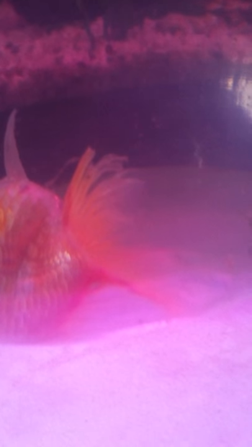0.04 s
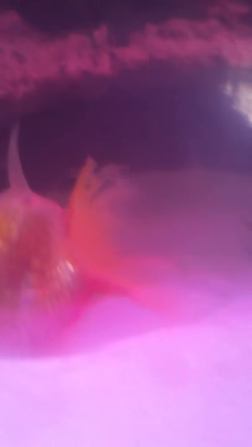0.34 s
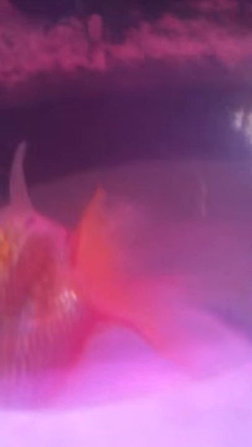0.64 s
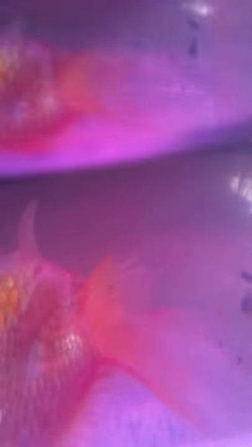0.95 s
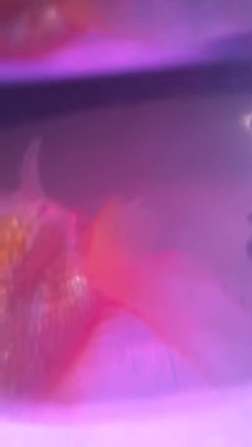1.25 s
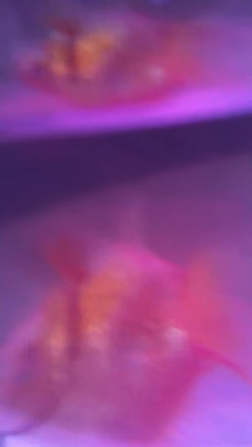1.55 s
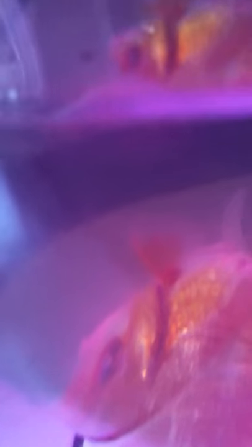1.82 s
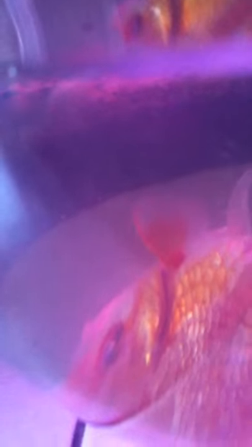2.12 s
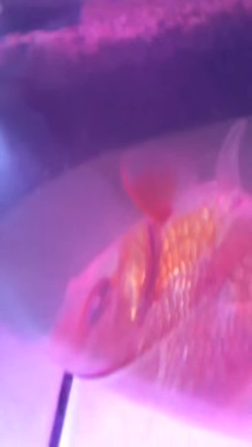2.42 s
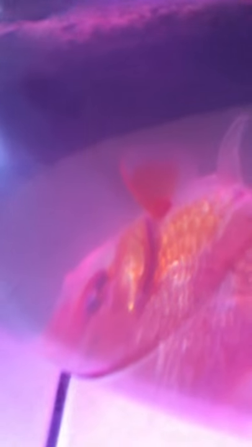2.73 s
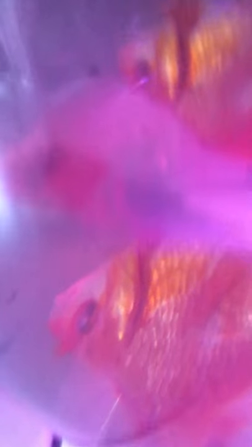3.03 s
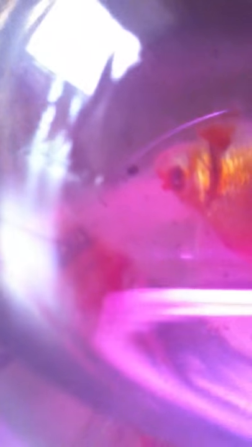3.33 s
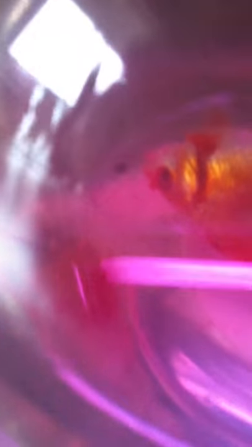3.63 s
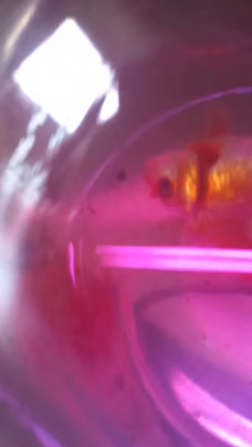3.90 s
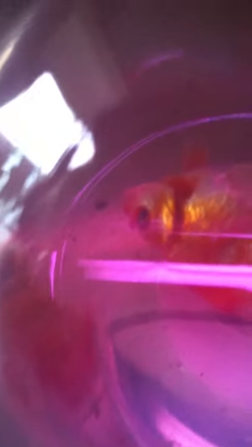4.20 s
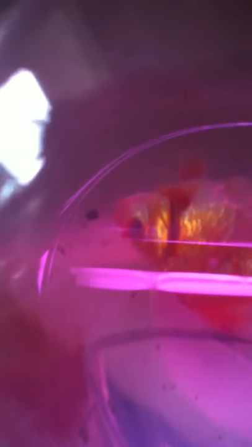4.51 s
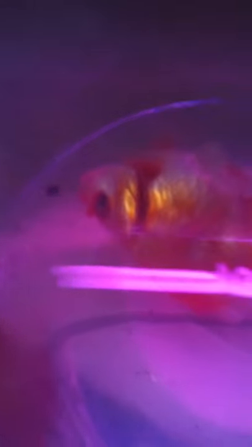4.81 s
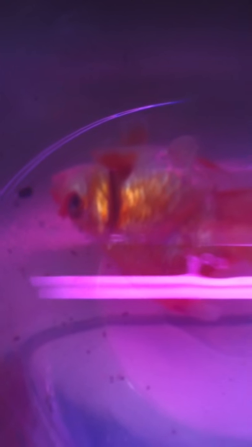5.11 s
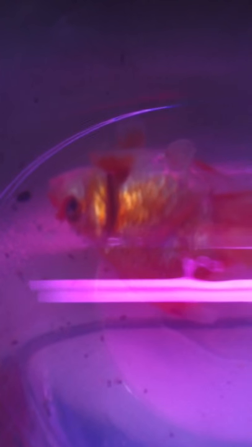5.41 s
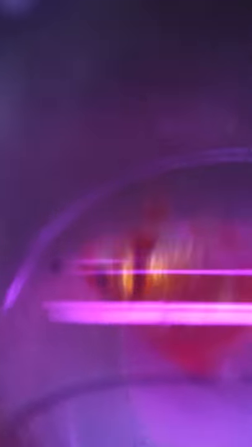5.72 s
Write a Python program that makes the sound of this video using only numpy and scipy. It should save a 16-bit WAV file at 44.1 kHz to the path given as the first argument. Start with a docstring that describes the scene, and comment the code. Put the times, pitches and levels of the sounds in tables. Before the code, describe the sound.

A fish tank's filter dribbles with small pings and plops, and late on a close knock bounces against the glass.

```python
"""In a small room, water trickles from a filter into a fish tank. Drops tick on the surface and trap air,
which rings as bubbles: small ones ping, large ones plop. Under them are churning water, a hiss and the
pump's hum. Something squeaks faintly and one drop snaps loudly. Near the end a dull, close knock
bounces twice and leaves the tank's glass ringing."""
import sys
import numpy as np
from scipy import signal
from scipy.fft import rfft, irfft, next_fast_len
from scipy.io import wavfile
from scipy.ndimage import map_coordinates

SR = 44100
rng = np.random.default_rng(int(sys.argv[2]) if len(sys.argv) > 2 else 0)


def transcribe(u):
    """Save the signal u as a 16-bit wav file named by the first command-line argument.

    u: samples, shape (n,) or (channels, n), limited to [-1, 1]; the rate is SR.
    q: integer samples, one column per channel.
    """
    v = np.clip(np.atleast_2d(u).T, -1, 1)
    q = np.round(v * 32767).astype(np.int16)
    wavfile.write(sys.argv[1], SR, q)


N = 253575

# the tones of the pump's hum: f/Hz, level/dB
PUMP_TONES = [(102, -77.5), (152, -66.5)]
# how strong the trickle is over time: t/s, churning level/dB, spray and hiss level/dB
TRICKLE = [(0.0, -54, -62), (0.77, -53, -60.5), (1.0, -55.5, -61.5), (2.49, -54.5, -61.5), (2.71, -54, -61),
           (3.68, -55, -62), (4.4, -55.5, -61), (4.79, -54.5, -61), (5.0, -54, -61.5)]
# the colour (how strong each pitch is) of churning water: f/Hz, level/dB
CHURN_COLOUR = [(25, -23), (50, -19.5), (90, -8), (130, -3), (190, 2.5), (290, 2), (335, -2.5), (400, -1.5),
                (520, -7), (700, -3), (870, -12.5), (1200, -15.5), (2600, -89)]
# the colour of the hiss: f/Hz, level/dB
HISS_COLOUR = [(350, -22), (700, -13), (1000, -1.5), (1700, -2.5), (2500, -5), (4000, -9.5), (5600, -9),
               (7500, -11.5), (11700, -10), (17000, -14.5)]
# the loudest drops: t/s, splash level/dB, bubble f/Hz, bubble level/dB,
# fizz f/Hz, fizz level/dB, rise time/s
DROP_HITS = [(0.094, -46, 6500, -54, 11100, -45, .005), (0.124, -57, 5500, -63, 9980, -44, .002),
             (0.207, -46, 5300, -28.5, 9000, -49, .0012), (0.249, -42, 8300, -35, 13900, -39, .0012),
             (0.387, -42.5, 5650, -44.5, 12300, -36, .0025), (0.614, -59, 5430, -45, 11000, -48, .006),
             (0.698, -55, 6900, -46, 10600, -39, 0.0027), (0.7558, -41, 5200, -39, 7800, -57, .0035),
             (0.843, -47.5, 3400, -54, 9400, -43, .0025), (0.903, -51, 7850, -50, 11800, -42, .0045),
             (1.017, -48, 8500, -56, 10800, -42, .002), (1.226, -49, 9000, -55, 12100, -39, .004),
             (1.32, -62, 5700, -45, 11500, -48, .002), (1.392, -41, 6000, -45, 11100, -44, 0.0046),
             (1.468, -60, 6900, -50, 11500, -49, .0035), (1.567, -45, 9220, -43.5, 12500, -37.5, .002),
             (1.619, -44.5, 7360, -47.5, 10100, -45.5, .003),
             (1.657, -46, 4560, -50.5, 11000, -47.5, 0.0033), (1.809, -46.5, 5200, -48.5, 11100, -47, .006),
             (1.926, -46, 5500, -38.5, 11000, -55, 0.0029), (2.0195, -40, 6060, -33, 14500, -47, 0.002),
             (2.191, -51, 6630, -37.5, 11000, -48, 0.0027), (2.224, -47, 6400, -37.5, 12200, -38.5, 0.0029),
             (2.3385, -48, 8450, -43, 12000, -44.5, .0018), (2.5319, -43, 4300, -45.5, 9650, -39, 0.0041),
             (2.758, -52, 7500, -48, 12300, -39.5, 0.0017), (2.8543, -35, 5700, -28.5, 11100, -26.5, .0007),
             (2.879, -53, 5070, -42.5, 8500, -51, .0013), (2.99, -65, 5950, -44, 10900, -44, 0.0055),
             (3.1295, -59, 8900, -45, 9900, -45, .0013), (3.19, -44.5, 5500, -46, 8000, -45, 0.0028),
             (3.235, -42, 5700, -41, 11900, -43.5, 0.0015), (3.31, -46, 3710, -56, 11500, -38.5, .0016),
             (3.352, -49, 3370, -50, 9100, -40, 0.0049), (3.364, -54, 3450, -47, 7000, -58, .003),
             (3.516, -65, 3860, -67, 12200, -39.5, .0014), (3.591, -44, 3590, -44.5, 9900, -40, .0018),
             (3.787, -42.5, 4530, -41, 9000, -54, .0015), (3.9149, -42, 6160, -34.5, 9400, -39.5, .0013),
             (4.007, -55, 5760, -60, 10000, -36, 0.0018), (4.079, -40, 5460, -57, 12800, -41.5, .004),
             (4.14, -41, 3850, -46, 9250, -40.5, .004), (4.1638, -56, 2460, -35.5, 3640, -36, 0.0013),
             (4.176, -38, 3470, -45, 5000, -46, 0.0032), (4.225, -41.5, 3750, -46, 7600, -48, 0.0057),
             (4.355, -39.5, 5340, -43, 11600, -37, 0.0017), (4.407, -52, 6000, -52, 9560, -43.5, .0025),
             (4.4443, -41.5, 6950, -38.5, 11900, -33.5, 0.0021), (4.545, -47, 7050, -54, 10200, -37, .0025),
             (4.5918, -40, 6760, -52, 11500, -47, .0055), (4.618, -43.5, 3500, -52, 7500, -46.5, .004),
             (4.837, -58, 6000, -63, 9530, -45.5, .0012), (4.9275, -51, 8300, -39, 12100, -44, .0014),
             (4.989, -61, 9000, -58, 13000, -40.5, .0025), (5.082, -40, 8500, -49, 12900, -43, 0.0041),
             (5.116, -45, 8000, -47, 12000, -39.5, .002), (5.189, -49, 8220, -45.5, 12500, -47, 0.0041),
             (5.361, -58, 6180, -42.5, 8000, -54, .0015), (5.543, -46, 5530, -45, 7500, -46, .0045),
             (5.669, -57, 8000, -53, 11400, -44, .006), (5.698, -43, 7550, -38, 9500, -45, 0.0044)]
# the colour of a splash: f/Hz, level/dB
SPLASH_COLOUR = [(200, 2), (700, 9), (1800, 3), (3900, 3.5), (5600, 6), (7500, -1), (11400, -1), (14000, 1),
                 (17000, -10)]
# single bubbles bursting at the surface: t/s, peak level/dB, f/Hz
BURSTING_BUBBLES = [(0.098, -48, 1590), (0.217, -46, 1780), (0.2475, -44.5, 3340), (0.388, -50, 1530),
                    (1.209, -49, 3220), (1.345, -43, 5450), (1.359, -44, 6100), (1.392, -44.5, 2210),
                    (2.0102, -41, 3260), (2.1148, -48, 3350), (2.4743, -45, 2370), (2.829, -41, 3200),
                    (3.304, -45.5, 1370), (3.331, -56, 1380), (3.547, -44, 3800), (3.816, -51, 1340),
                    (4.128, -40, 3450), (4.597, -51, 1350), (4.977, -48, 1380), (5.398, -45, 3240)]
# the loudest large bubbles: t/s, relative level/dB, f/Hz
LARGE_BUBBLES = [(0.2, -42, 653), (0.522, -41, 713), (0.847, -43.5, 746), (0.903, -43, 694),
                 (1.141, -47.5, 735), (1.224, -44, 393), (1.228, -43.5, 640), (1.463, -46, 426),
                 (1.811, -44.5, 660), (2.019, -45.5, 680), (2.063, -44, 676), (2.488, -46.5, 380),
                 (2.519, -44, 767), (2.527, -47.5, 384), (2.755, -49, 655), (2.759, -40.5, 370),
                 (2.851, -48, 386), (3.112, -33, 376), (3.151, -40.5, 353), (3.290, -40, 752),
                 (4.078, -36, 414), (4.083, -46, 785), (4.212, -44, 413), (4.232, -43, 436),
                 (4.24, -44, 717), (4.33, -43, 767), (4.365, -50.5, 425), (4.443, -44.5, 704),
                 (4.526, -42.5, 424), (4.523, -45, 730), (4.591, -38.5, 414), (4.597, -48, 780),
                 (4.661, -40.5, 707), (4.805, -41.5, 750)]
# a knock and its two bounces: t/s, push level/dB, contact time/s, ring level/dB
KNOCK_HITS = [(5.0602, -3.5, 0.0036, -23), (5.091, -8, 0.004, -0.5), (5.109, -14.5, 0.00444, -2)]
# the tones the glass rings with: f/Hz, relative level/dB, t60/s (the time to fade by 60 dB)
GLASS_TONES = [(140.6, -42.5, 0.36), (180, -30, 0.1), (260, -35.5, 0.091), (1530, -53, 0.35),
               (2790, -56, 0.19)]
# how long the room echoes at each pitch: f/Hz, t60/s
ROOM_FADE = [(150, 0.27), (1000, 0.37), (5500, 0.23), (8000, 0.2), (16000, 0.076)]


def amp(db):
    """Turn decibels into a number to multiply by."""
    return 10 ** (np.asarray(db) / 20)


def unit(x):
    """Scale a sound so that its average strength (rms) is 1."""
    return x / np.sqrt(np.mean(x ** 2) + 1e-20)


def along(points, hz):
    """Read between the rows of a (frequency, value) table, on a log scale of frequency."""
    freqs, values = np.transpose(points)
    return np.interp(np.log(hz + 1), np.log(freqs + 1), values)


def wobble(rate):
    """A smooth curve through `rate` random values a second."""
    return map_coordinates(rng.standard_normal(int(N * rate / SR) + 4), [np.arange(N) * rate / SR])


def filtered(x, response):
    """Turn each frequency in x up or down by response(hz)."""
    size = next_fast_len(N + 8192)
    return irfft(rfft(x, size) * response(np.fft.rfftfreq(size, 1 / SR)), size)[:N]


def noise(colour):
    """Noise shaped by rows of f/Hz, level/dB."""
    return unit(filtered(rng.standard_normal(N), lambda hz: amp(along(colour, hz))))


def add(track, s, sound):
    """Mix a sound into a track, starting at s seconds."""
    part = track[max(round(s * SR), 0):][:len(sound)]
    part += sound[:len(part)]


def bubble(hz, cycles, rise, onset):
    """Trapped air pulses: it swells over `onset` cycles, fades 60 dB over `cycles` and glides upward."""
    age = np.arange(int(cycles * SR / hz) + 2) * hz / SR
    envelope = amp(-60 * age / cycles) * (1 - np.exp(-age / onset))
    return envelope * np.sin(2 * np.pi * age * (1 + rise * age / cycles))


def swarm(rate, centre_hz, octaves, cycles, range_db):
    """Bubbles of random time and loudness, `rate` a second, up to `octaves` above or below the centre."""
    out = np.zeros(N)
    for when, pitch, size in rng.random((int(rate * N / SR), 3)):
        hz = centre_hz * 2 ** (octaves * (2 * pitch - 1))
        add(out, when * N / SR, amp(range_db * size ** 2) * bubble(hz, cycles, rise=0.19, onset=0.67))
    return unit(out)


def cluster(hz, width, samples):
    """Many bubbles of about one size ring together as a narrow band of noise."""
    freqs = np.fft.rfftfreq(samples, 1 / SR)
    band = 1 / (1 + ((freqs - hz) / (width * hz)) ** 2)
    return unit(irfft(rfft(rng.standard_normal(samples)) * band, samples))


def pump(waver_db=2.0, drift=0.33):
    """The filter's pump hums low and almost steadily."""
    hum, t = np.zeros(N), np.arange(N) / SR
    for hz, db in PUMP_TONES:
        gain = amp(db + waver_db * wobble(3.94))
        hum += gain * unit(np.sin(2 * np.pi * hz * t + drift * wobble(3.01)))
    return hum


def churn():
    """Stirred water makes a low wash, full of soft, overlapping bubbles."""
    wash = amp(1 + 0.44 * wobble(16)) * noise(CHURN_COLOUR)
    gurgle = swarm(rate=70, centre_hz=254.4, octaves=0.878, cycles=15.4, range_db=4.5)
    burble = swarm(rate=70, centre_hz=696, octaves=0.28, cycles=50, range_db=22)
    return wash + amp(-4) * gurgle + amp(-14) * burble


def spray(rate=90, range_db=9, tick_t60=0.014, rise_s=0.0016, centre_hz=9000, octaves=0.75):
    """Fine droplets tick, each at its own pitch, and a crowd of small bubbles blends into a fizz."""
    ticks, t = np.zeros(N), np.arange(SR // 20) / SR
    for when, size, pitch in rng.random((int(rate * N / SR), 3)):
        tick = cluster(centre_hz * 2 ** (octaves * (2 * pitch - 1)), width=0.27, samples=len(t))
        envelope = amp(range_db * size ** 2 - 60 * t / tick_t60) * (1 - np.exp(-t / rise_s))
        add(ticks, when * N / SR, envelope * tick)
    fizz = swarm(rate=260, centre_hz=3200, octaves=0.9, cycles=26, range_db=5)
    return amp(-4.5) * unit(ticks) + amp(-8) * fizz


def tinkle(level_db=-70.5, swell_db=5.5, swell_at_s=3.27, settle_s=1):
    """The stream keeps middle-sized and smaller bubbles tinkling; the sound swells once, then settles."""
    since = np.arange(N) / SR - swell_at_s
    swell = (since > 0) * np.exp(-np.abs(since) / settle_s)
    middle = swarm(rate=170, centre_hz=1340, octaves=0.19, cycles=44, range_db=13)
    smaller = swarm(rate=220, centre_hz=2900, octaves=0.45, cycles=30, range_db=6)
    return amp(level_db + swell_db * swell + 2.5 * wobble(14)) * (middle + amp(-5) * smaller)


def drops(spatter_t60=0.055, spatter_db=-17, snap_s=0.0071, linger=1.47, lead_s=0.016):
    """Each drop splashes and traps bubbles and finer fizz. Compact drops snap; drawn-out ones linger."""
    splash, pings = np.zeros(N), np.zeros(N)
    t = np.arange(SR // 8) / SR - lead_s  # starts just before the drop lands
    after = np.maximum(t, 0)
    splash_noise = noise(SPLASH_COLOUR)
    for s, splash_db, bubble_hz, bubble_db, fizz_hz, fizz_db, rise_s in DROP_HITS:
        snap = amp(-60 * after / (snap_s + linger * rise_s))
        spatter = amp(spatter_db - 60 * after / spatter_t60)
        envelope = (snap + spatter) * (1 + np.tanh(t / rise_s)) / 2
        add(splash, s - lead_s, amp(splash_db) * envelope)
        for hz, db, width in (bubble_hz, bubble_db, 0.094), (fizz_hz, fizz_db, 0.18):
            add(pings, s - lead_s, amp(db) * envelope * cluster(hz, width, len(t)))
            add(pings, s, amp(db) * droplets(hz))
        # one bubble breaks free as the drop lands and gives a clear ping
        add(pings, s, amp(bubble_db - 9) * bubble(bubble_hz, cycles=46, rise=0.037, onset=3.0))
    return splash * splash_noise + pings


def droplets(hz, first_s=0.0047, flight_s=0.045, fade_db=14, octaves=0.57, count=8):
    """Droplets thrown up by a drop fall back and tick around its pitch; the late ones are weaker."""
    out = np.zeros(SR // 8)
    for late, pitch in rng.random((count, 2)):
        ring = bubble(hz * 2 ** (octaves * (2 * pitch - 1)), cycles=30, rise=0.053, onset=2.1)
        add(out, first_s + flight_s * late ** 2, amp(-10 - fade_db * late) * ring)
    return out


def blips():
    """Single middle-sized bubbles burst at the surface with a short, soft blip."""
    out = np.zeros(N)
    for s, db, hz in BURSTING_BUBBLES:
        ring = bubble(hz, cycles=24, rise=0.056, onset=2.2)
        add(out, s, amp(db) * ring / np.abs(ring).max())
    return out


def plops(ring_db=4.5, stir_db=-17, stir_t60=0.1):
    """Large bubbles, pushed under by the stream, ring low and stir the water around them."""
    rings, stir, t = np.zeros(N), np.zeros(N), np.arange(SR // 6) / SR
    for s, db, hz in LARGE_BUBBLES:
        add(rings, s, amp(db + ring_db) * bubble(hz, cycles=34.4, rise=0.043, onset=2.2))
        add(stir, s, amp(db + stir_db - 60 * t / stir_t60))
    return rings + stir * noise([(40, -40), (150, -12), (400, 17), (720, 19), (1300, -7), (4000, -31)])


def squeak(start_s=2.405, rise_s=0.022, hold_s=0.22, fade_s=0.12, level_db=-60.5, waver_hz=21):
    """A faint, thin tone wavers and flutters, with a weaker one below it."""
    envelope = np.interp(np.arange(N) / SR, np.cumsum([start_s, rise_s, hold_s, fade_s]), [0, 1, 1, 0])
    pitches_hz = [hz + waver_hz * wobble(30) for hz in (2775, 1750)]
    upper, lower = [np.sin(2 * np.pi * np.cumsum(hz) / SR) for hz in pitches_hz]
    return amp(level_db + 4.5 * wobble(35)) * envelope * (upper + amp(-6.5) * lower)


def knock(bass_cut_hz=150, hardness=2.06, panel_hz=676, panel_q=3.15):
    """A knock and two bounces: each short push thumps a dull panel; the bounces set the glass ringing."""
    push, jolts, t = np.zeros(N), np.zeros(N), np.arange(N) / SR
    for s, db, contact_s, ring_db in KNOCK_HITS:
        force = np.abs(np.sin(np.pi * np.minimum(t / contact_s, 1))) ** hardness
        add(push, s, -amp(db) * force)
        add(jolts, s, amp(ring_db) * force / force.sum())
    thump = signal.sosfilt(signal.butter(5, bass_cut_hz, "high", fs=SR, output="sos"), push)
    panel = amp(14) * signal.lfilter(*signal.iirpeak(panel_hz, panel_q, SR), thump)
    ring = np.zeros(N)
    for hz, db, t60 in GLASS_TONES:
        # every jolt tops up the swing of this tone, which then dies away
        swing = signal.lfilter([1], [1, -amp(-60 / (t60 * SR))], jolts)
        ring += amp(db) * swing * np.sin(2 * np.pi * hz * t)
    # the surfaces grate for as long as they touch and shake
    grit = noise([(400, -42), (1000, -2.0), (1600, -4.5), (2400, -14), (3000, -11.5), (4200, -28),
                  (9000, -21.5), (16000, -31)])
    return thump + panel + ring + amp(-28) * np.hypot(push, thump) * grit


def tank_echoes(x, t60=0.041, first_s=0.0015):
    """Sound bounces quickly between water and glass; the rippling surface keeps changing the echoes."""
    t = np.arange(SR // 16) / SR
    echoes = rng.standard_normal((6, len(t))) * amp(-60 * t / t60) * (t > first_s)
    echoes /= np.linalg.norm(echoes, axis=1, keepdims=True)
    paths = signal.fftconvolve(x[None], echoes, axes=1)[:, :N]
    shares = np.array([wobble(8) for _ in paths])
    return np.sum(shares * paths, axis=0) / np.linalg.norm(shares, axis=0)


def room_echo(x, delay_s=0.007, pieces=14):
    """The room's echo, a little different from moment to moment; the highest pitches die first."""
    hz, t, spectra = signal.stft(rng.standard_normal((pieces, SR // 2)), SR, nperseg=256)
    fade = amp(-60 * t / along(ROOM_FADE, hz)[:, None])
    tails = signal.istft(spectra * fade, SR, nperseg=256)[1]
    out = np.zeros(N)
    for part, tail in zip(np.array_split(np.arange(N), pieces), tails):
        add(out, part[0] / SR + delay_s, signal.fftconvolve(x[part], tail / np.linalg.norm(tail)))
    return out


def scene():
    """Mix the water, the knock and their echoes over the hum, churning, hiss and squeak."""
    times, *levels = np.transpose(TRICKLE)
    churn_db, spray_db = [np.interp(np.arange(N) / SR, times, db) for db in levels]
    background = pump() + amp(churn_db - 2.5) * churn()
    background += amp(spray_db + 0.5) * noise(HISS_COLOUR) + squeak()
    thud = knock()
    splashes = amp(spray_db + 1.5) * spray() + drops() + blips()
    water = splashes + amp(-5) * tank_echoes(splashes) + tinkle()
    glugs = plops()
    echo = room_echo(amp(-8) * water + amp(-9.5) * glugs + amp(-31) * thud)
    return (water + glugs + thud + background + echo)[None]


def record(dry, top_hz=17300):
    """Cut away all sound above top_hz."""
    return filtered(dry[0], lambda hz: hz < top_hz)[None]


dry = scene()
out = record(dry)
transcribe(out)
```